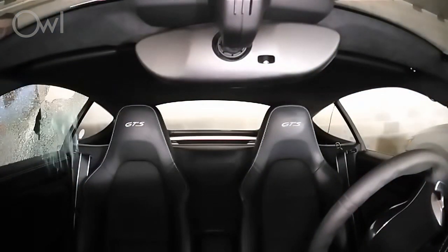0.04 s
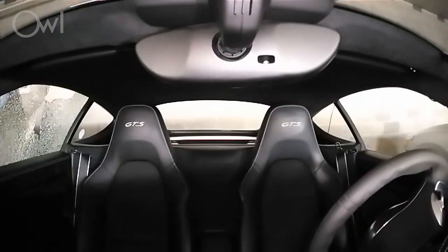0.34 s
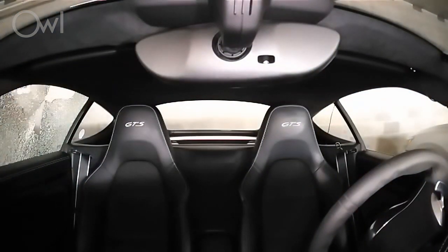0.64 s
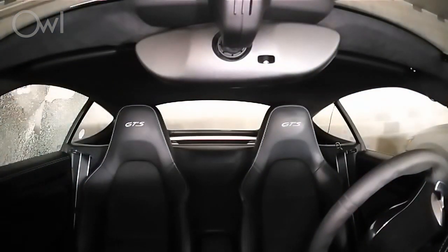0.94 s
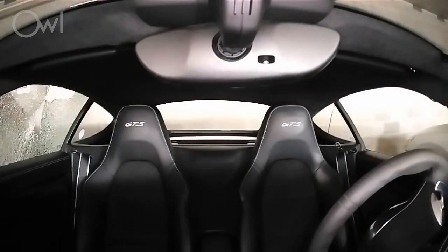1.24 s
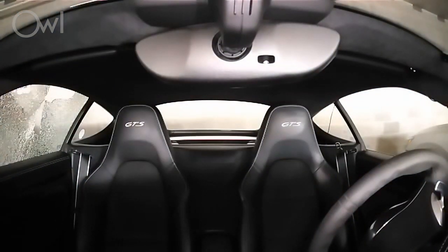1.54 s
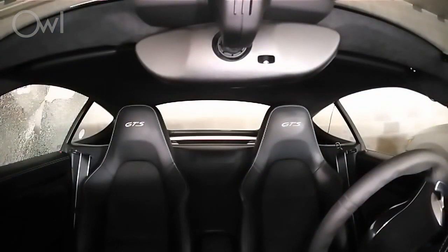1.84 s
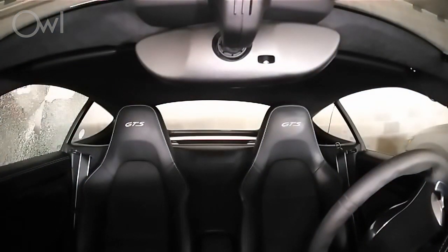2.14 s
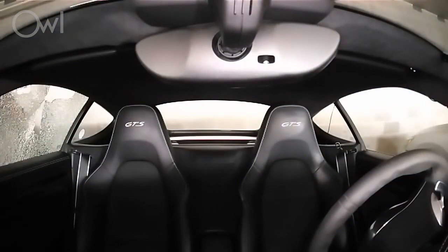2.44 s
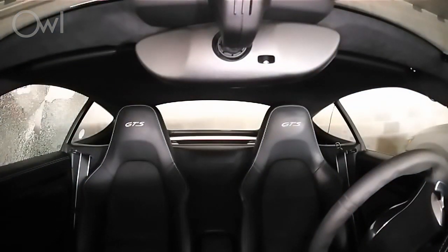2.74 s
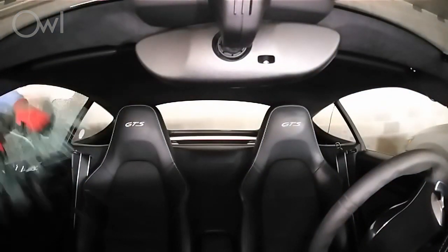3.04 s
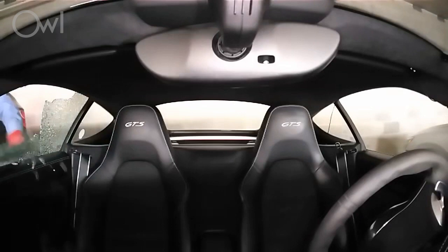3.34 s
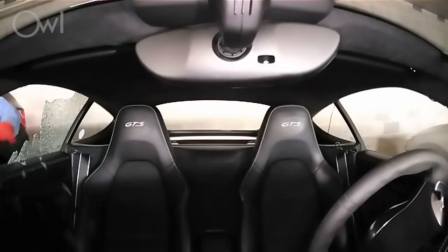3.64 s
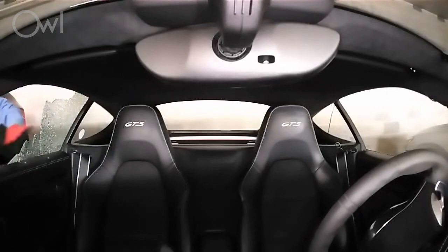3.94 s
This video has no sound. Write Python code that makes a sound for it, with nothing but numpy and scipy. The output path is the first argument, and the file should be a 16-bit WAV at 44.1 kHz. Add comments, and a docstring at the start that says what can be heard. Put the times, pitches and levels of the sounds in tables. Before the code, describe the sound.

Glass shatters as a parked car's window is struck, close by within the cabin. Tinkling bits fall and thin out to faint ticks, until another hit pushes the pane in with a thumping rush of fragments.

```python
"""A sharp, booming crash comes first: a parked car's side window is smashed, heard from inside the cabin.
The tempered pane crackles, sheds crumbs onto door trim and seat, then ticks quietly.
A second blow pushes the crazed pane in, and the glass pours down in a dense, thumping rush.
Fractures and impacts are random impulses coloured by what they shake; loose splinters ring as damped
sinusoids. The cabin adds short reflections, and a faint rumble and whine lie underneath."""
import sys
import numpy as np
from scipy import signal
from scipy.io import wavfile
from scipy.ndimage import uniform_filter1d

SR = 44100
rng = np.random.default_rng(int(sys.argv[2]) if len(sys.argv) > 2 else 0)


def dump(signal):
    """Clip the signal to [-1, 1] and save it as 16-bit WAV at the path in sys.argv[1]."""
    limited = np.clip(np.atleast_2d(signal).T, -1, 1)
    pcm = np.round(limited * 32767).astype(np.int16)
    wavfile.write(sys.argv[1], SR, pcm)


N = 176400

# blows on the pane (time [s], glass level [dB], body level [dB], body hold [s], body T60 [s])
BLOWS = [(0.0884, -11.5, -7.5, .036, .11), (3.163, -27, -17.5, 0.0078, 0.059)]
# cracks running through the pane (time [s], level [dB])
CRACKS = [(0.155, -22.5), (0.178, -14), (0.213, -19), (0.2237, -10), (0.287, -8), (.320, -13),
          (0.349, -8.5), (0.4553, -15.5), (0.468, -11.5), (0.609, -12), (.682, -14), (0.733, -25),
          (1.161, -38), (1.2215, -33), (1.248, -20), (1.274, -22), (1.305, -32), (1.34, -34.5),
          (1.5375, -45.5), (1.556, -39), (3.28, -22.5), (3.3, -12), (3.349, -10.5), (3.363, -14),
          (3.396, -17.5), (3.416, -16.5), (3.456, -7)]
# sharp high ticks of the crazed pane (time [s], level [dB])
TICKS = [(1.731, -41.5), (1.910, -59), (1.992, -54), (2.317, -46.5), (2.499, -42.5), (2.536, -41),
         (2.607, -41.5), (2.651, -33), (2.826, -54.5), (3.021, -44.5)]
# larger pieces knocking on hard trim (time [s], level [dB], resonance [Hz])
CLACKS = [(.789, -38, 1840), (0.849, -39, 1300), (1.2234, -31, 2030), (1.250, -29.5, 1250),
          (1.274, -27.5, 1310), (1.365, -40.5, 2960), (1.421, -40, 1670), (1.453, -45.5, 1710),
          (1.554, -30.5, 1430), (1.577, -33.5, 1000), (1.692, -56, 990), (3.226, -25, 880),
          (3.362, -15, 1640), (3.769, -20, 1740), (3.916, -17, 1170)]
# clumps landing on door panel, seat and floor (time [s], level [dB], resonance [Hz])
THUDS = [(0.35, -24.5, 370), (.552, -31, 257), (0.651, -28, 463), (.657, -20, 265), (0.744, -30.5, 199),
         (0.821, -33.5, 410), (.887, -32.5, 199), (1.018, -29.5, 211), (1.211, -30.5, 425),
         (1.247, -33, 383), (1.326, -24, 157), (1.338, -31, 64), (1.580, -28.5, 470), (3.279, -24, 557),
         (3.412, -11.5, 149), (3.494, -13.5, 165.6), (3.642, -13.5, 168), (3.78, -11, 145)]
# single splinters ringing clearly (time [s], level [dB], pitch [Hz])
PINGS = [(.410, -19, 14400), (0.736, -29, 14100), (.960, -33, 13900), (1.218, -23.5, 11200)]
# glass falling after the first and second blow (time [s], tinkle [dB], clatter [dB], rumble [dB])
CRUMBLE_FLOW = [(.10, -47, -48, -29), (.17, -34, -39, -29.5), (.305, -12.5, -28, -42.5),
                (.448, -26, -39, -38.5), (.48, -15.5, -42, -43), (.555, -13, -32, -29),
                (.68, -19.5, -43.5, -29), (.725, -36.5, -40.5, -32), (.89, -40, -45.5, -46),
                (1.14, -54, -65.5, -48.5), (1.21, -46, -41.5, -47), (1.51, -64.5, -75, -69.5),
                (1.63, -54.5, -60, -51), (1.78, -78.5, -83, -88.5), (3.1, -91, -116, -90.5)]
RUSH_FLOW = [(3.166, -14, -41, -29.5), (3.21, -11.5, -30.5, -25.5), (3.27, -20.5, -40.5, -30),
             (3.445, -24, -26, -26.5), (3.47, -11, -21.5, -23), (3.62, -12, -26.5, -16),
             (3.73, -12, -29.5, -22.5), (3.80, -13, -25, -17), (4.0, -13, -25, -19)]
# spectra of the three parts of each fall (frequency [Hz], relative level [dB])
CRUMBLE_TINKLE = [(800, -18.5), (2500, -16), (4200, -18.5), (4900, -11), (5500, -5), (7000, -2.5),
                  (9500, -2), (13500, 3), (15500, -2.5)]
CRUMBLE_CLATTER = [(300, -9), (750, -14), (1300, 1.5), (2200, -2), (4200, -12.5), (8000, -22.5)]
CRUMBLE_RUMBLE = [(30, -20.5), (60, -12), (120, -6.5), (190, 1), (350, -0.5), (520, -15.5), (750, -32),
                  (2000, -48.5)]
RUSH_TINKLE = [(800, -31.5), (2500, -15.5), (4000, -12), (7500, -6.5), (12500, -0.5), (15500, -2.5)]
RUSH_CLATTER = [(200, -2), (450, -1), (800, 0), (1600, -1.5), (2500, -7.5), (4200, -18.5), (8000, -12)]
RUSH_RUMBLE = [(25, -31), (60, -5.5), (160, 1.5), (230, -5), (340, -9), (700, -21), (2000, -58)]
# spectra of booming body, struck trim, ticks and background (frequency [Hz], relative level [dB])
BODY_SPECTRUM = [(25, -19), (100, -10.5), (195, -1.5), (270, -12), (600, -17), (1000, -27), (6000, -52.5)]
TRIM_SPECTRUM = [(200, -19.5), (1300, -10), (4000, -8.5), (15500, -11.5)]
TICK_SPECTRUM = [(500, -29), (4000, -30), (5500, -18.5), (8000, -10.5), (11000, -2), (13000, 8),
                 (15500, 3.5)]
BACKGROUND_SPECTRUM = [(20, -20), (70, 4), (100, -19.5), (180, -13.5), (240, -25), (4000, -43)]
# reverberation time of the cabin (frequency [Hz], T60 [s])
CABIN_T60 = [(100, 0.14), (500, .12), (2000, 0.098), (6000, 0.11), (15000, 0.21)]

WHINE_HZ, WHINE_DB, BACKGROUND_DB = 12160, -75.5, -68
PEAK_TINKLES_PER_S, PEAK_SHARDS_PER_S = 2800, 500
CLATTERS_PER_S, CHIPS_PER_S, BUMPS_PER_S = 400, 260, 160
CLUMP_DB, CLUMP_S = 2.5, 0.0062
THINNING = 0.55  # as the flow weakens, tinkles get fewer as well as softer
GAP_START_S, GAP_END_S = 1.752, 1.778  # a moment of silence
BAND_LIMIT_HZ = 15800


def amp(db):
    """Amplitude ratio of a level in decibels."""
    return 10 ** (np.asarray(db) / 20)


def unit(x):
    """Normalisation to an rms of 1."""
    return x / np.sqrt(np.mean(x ** 2) + 1e-20)


def match_rms(x, shape):
    """Energy matching: x takes the rms of its envelope."""
    return unit(x) * np.sqrt(np.mean(shape ** 2))


def read(points, hz):
    """Interpolation on a logarithmic frequency axis."""
    f, value = np.transpose(points)
    return np.interp(np.log(hz + 1), np.log(f + 1), value)


def add(mix, s, sound):
    """Superposition: a sound joins the mix at time s."""
    part = mix[max(round(s * SR), 0):][:len(sound)]
    part += sound[:len(part)]


def colour(x, spectrum):
    """Minimum-phase filtering: a causal response of unit energy imposes the spectrum."""
    log_gain = np.log(amp(read(spectrum, abs(np.fft.fftfreq(8192, 1 / SR)))))
    response = np.exp(np.conj(signal.hilbert(log_gain)))
    taps = np.fft.ifft(response).real[:3000]
    return signal.oaconvolve(x, taps / np.linalg.norm(taps))[:len(x)]


def envelope(hold, t60, rise=0.0011):
    """Exponential damping: after rise and hold, a fall of 60 dB in t60 (all in seconds)."""
    t = np.arange(SR // 3) / SR
    return np.minimum(t / rise, 1) * amp(-60 * np.maximum(t - hold, 0) / t60)


def grains(rate, spread_db, size=N):
    """Poisson process: independent clicks of uneven strength, at a mean rate per second."""
    chance, strength, sign = rng.random((3, size))
    level_db = spread_db * np.minimum(-np.log(1 - strength), 4)
    return unit((chance < rate / SR) * np.sign(sign - 0.5) * amp(level_db))


def burst(shape, spectrum, rate=9000):
    """Source and filter: a volley of tiny clicks under an envelope is coloured by a spectrum."""
    clicks = shape * grains(rate, spread_db=3.3, size=len(shape))
    return match_rms(colour(clicks, spectrum), shape)


def ring(shape, hz, width_hz):
    """Resonance: a burst of noise drives two equal band-pass stages, each width_hz wide."""
    b, a = signal.iirpeak(hz, hz / width_hz, fs=SR)
    drive = shape * rng.standard_normal(len(shape))
    return match_rms(signal.lfilter(b, a, signal.lfilter(b, a, drive)), shape)


def steady(x):
    """Division by the running rms evens out slow swings of level and keeps the grain."""
    return x / np.sqrt(abs(uniform_filter1d(x ** 2, size=2600)) + 1e-6)


def background():
    """Stationary noise and a pure tone: a faint low rumble under a thin high whine."""
    whine = np.sqrt(2) * np.sin(2 * np.pi * WHINE_HZ * np.arange(N) / SR)
    rumble = unit(colour(rng.standard_normal(N), BACKGROUND_SPECTRUM))
    return amp(BACKGROUND_DB) * rumble + amp(WHINE_DB) * whine


def cabin(x, wet_db):
    """Reverberation: dense reflections die quickly in the upholstered cabin, each band at its own rate."""
    reflections = rng.standard_normal(SR // 4) * (rng.random(SR // 4) < 0.1)
    hz, t, bands = signal.stft(reflections, SR, nperseg=128)
    decay = amp(-60 * t / read(CABIN_T60, hz)[:, None])
    tail = signal.istft(bands * decay, SR, nperseg=128)[1]
    tail[:SR // 700] = 0  # delay of the first reflection
    wet = signal.oaconvolve(x, tail / np.linalg.norm(tail))[:N]
    return (x + amp(wet_db) * wet) / np.hypot(1, amp(wet_db))


def ticks():
    """Transients: sharp high ticks; after the gap, a faint fading crackle and thin ring are added to each."""
    out = np.zeros(N)
    snap, tail = envelope(hold=0.0033, t60=0.089), envelope(hold=0.0033, t60=0.31)
    for s, db in TICKS:
        add(out, s, amp(db) * burst(snap, TICK_SPECTRUM))
        if s > GAP_END_S:
            add(out, s, amp(db - 11) * burst(tail, TICK_SPECTRUM, rate=1500))
            add(out, s, amp(db - 18) * ring(tail, WHINE_HZ, width_hz=120))
    return out


def pings():
    """Free vibration: a splinter bounces loose and rings on one high note."""
    out, shape = np.zeros(N), envelope(hold=0, t60=0.14)
    for s, db, hz in PINGS:
        add(out, s, amp(db) * shape * np.sin(2 * np.pi * hz * np.arange(len(shape)) / SR))
    return out


def clacks():
    """Hard impact: larger pieces hit plastic trim, each with a broadband knock and a short resonance."""
    out, shape = np.zeros(N), envelope(hold=0.0089, t60=0.074)
    for s, db, hz in CLACKS:
        knock = burst(shape, TRIM_SPECTRUM)
        add(out, s, amp(db) * (knock + amp(-1) * ring(shape, hz, width_hz=710)))
    return out


def thuds():
    """Heavy damping: clumps of glass swing a padded panel for a few cycles and rattle on it."""
    out, shape = np.zeros(N), envelope(hold=0.0085, t60=0.12, rise=0.0033)
    for s, db, hz in THUDS:
        cycles = hz * np.arange(len(shape)) / SR
        push = cycles * np.exp(1 - cycles) * np.sin(2 * np.pi * cycles)
        rattle = amp(-7.5) * ring(shape, hz, width_hz=0.65 * hz)
        add(out, s, amp(db) * match_rms(push + rattle, shape))
    return out


def fragments(rate, low_hz, high_hz, t60):
    """Natural frequencies: each loose fragment rings briefly at its own pitch."""
    out, t = np.zeros(N), np.arange(SR // 20) / SR
    hits = grains(rate, spread_db=2.6)
    pitches = low_hz + (high_hz - low_hz) * rng.random(N)
    decay = amp(-60 * t / t60)
    for i in np.flatnonzero(hits):
        add(out, i / SR, hits[i] * np.sin(2 * np.pi * pitches[i] * t) * decay)
    return unit(out)


def falling_glass(flow, *spectra):
    """Granular flow: crumbs tinkle against each other, clatter on trim and drum on the panels."""
    times, *levels = np.transpose(flow)
    t = np.arange(N) / SR
    knots = np.arange(0, N / SR, CLUMP_S)  # crumbs fall in clumps
    clumps = amp(CLUMP_DB * np.interp(t, knots, rng.standard_normal(N)[:len(knots)]))
    tinkle_db = levels[0]
    density = amp(THINNING * (np.interp(t, times, tinkle_db) - tinkle_db.max()))
    tinkle = clumps * grains(density * PEAK_TINKLES_PER_S, spread_db=5)
    tinkle += amp(-9) * fragments(density * PEAK_SHARDS_PER_S, low_hz=5000, high_hz=15500, t60=0.028)
    clatter = clumps * grains(CLATTERS_PER_S, spread_db=1.5)
    clatter += fragments(CHIPS_PER_S, low_hz=600, high_hz=3800, t60=0.010)
    rumble = grains(BUMPS_PER_S, spread_db=3)
    out = np.zeros(N)
    for impacts, spectrum, db in zip((tinkle, clatter, rumble), spectra, levels):
        texture = steady(cabin(colour(impacts, spectrum), wet_db=0.5))
        out += texture * amp(np.interp(t, times, db))
    return out * (t >= times[0])


def cracks():
    """Brittle fracture: cracks run through the pane in bright snaps."""
    out, shape = np.zeros(N), envelope(hold=0.0059, t60=0.067, rise=0.0033)
    for s, db in CRACKS:
        add(out, s, amp(db) * burst(shape, CRUMBLE_TINKLE))
    return out


def blows():
    """Impulsive excitation: the pane bursts while door and cabin boom."""
    out = np.zeros(N)
    for s, glass_db, body_db, hold, t60 in BLOWS:
        add(out, s, amp(glass_db) * burst(envelope(hold=0.02, t60=0.12), RUSH_TINKLE))
        add(out, s, amp(body_db) * burst(envelope(hold, t60), BODY_SPECTRUM))
    return out


def scene():
    """Superposition of all sources in the middle of the cabin."""
    hits = blows() + thuds() + pings() + cabin(cracks() + ticks() + clacks(), wet_db=-23)
    crumble = falling_glass(CRUMBLE_FLOW, CRUMBLE_TINKLE, CRUMBLE_CLATTER, CRUMBLE_RUMBLE)
    rush = falling_glass(RUSH_FLOW, RUSH_TINKLE, RUSH_CLATTER, RUSH_RUMBLE)
    return (hits + crumble + rush + background())[None]


def record(dry):
    """Soft saturation rounds the peaks, the sound cuts out briefly, and a low-pass limits the band."""
    t = np.arange(N) / SR
    saturated = dry / (1 + dry ** 4) ** (1 / 4)
    gate = uniform_filter1d(1. * ((t < GAP_START_S) | (t > GAP_END_S)), size=100)
    low_pass = signal.firwin(701, BAND_LIMIT_HZ, window=("kaiser", 9), fs=SR)
    return signal.oaconvolve(gate * saturated, low_pass[None], "same")


dry = scene()
out = record(dry)
dump(out)
```